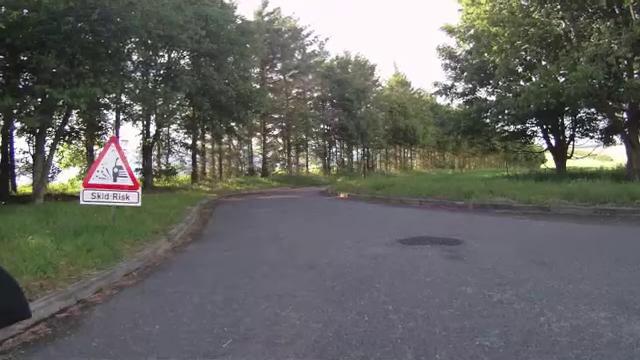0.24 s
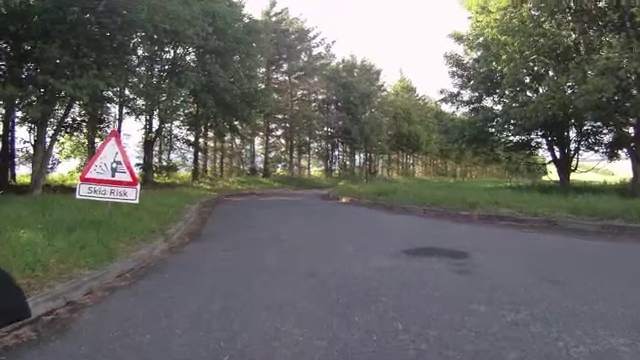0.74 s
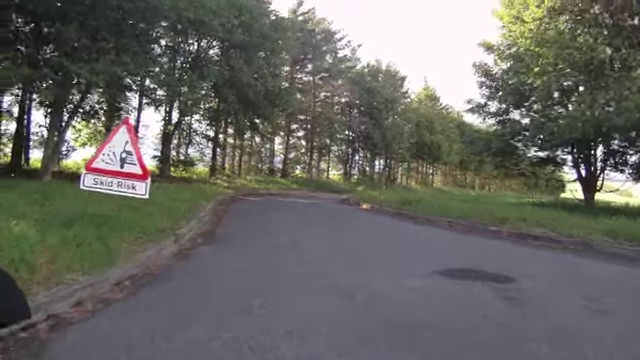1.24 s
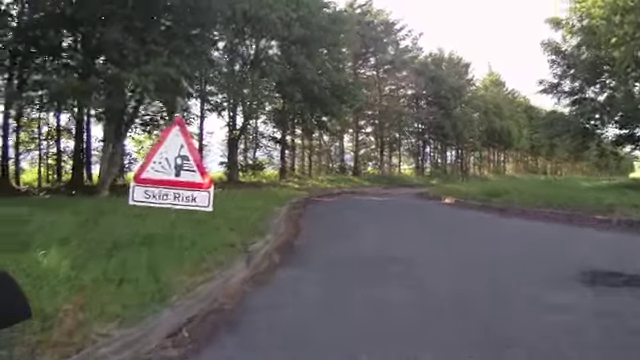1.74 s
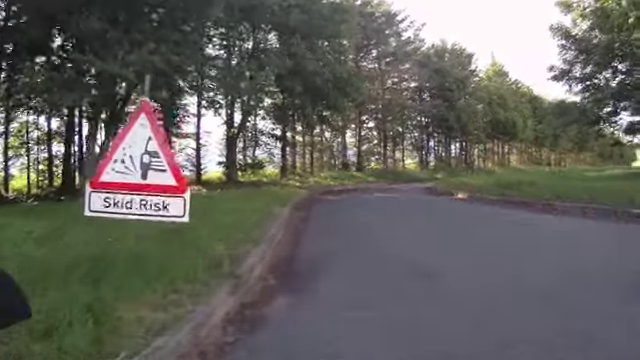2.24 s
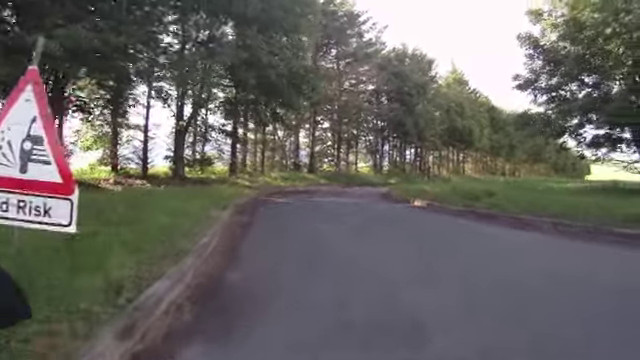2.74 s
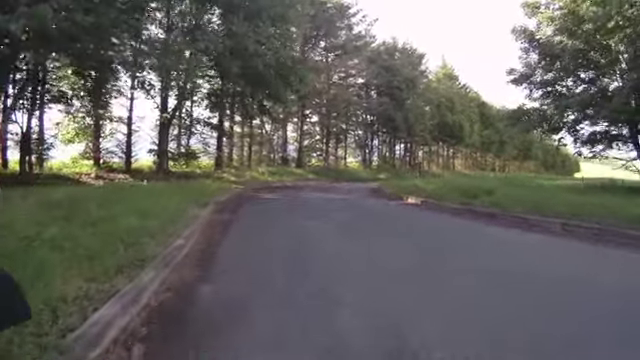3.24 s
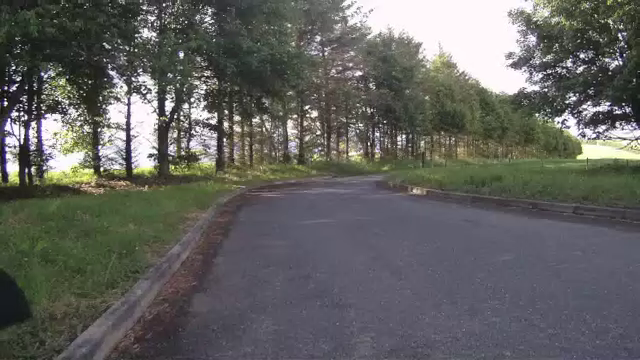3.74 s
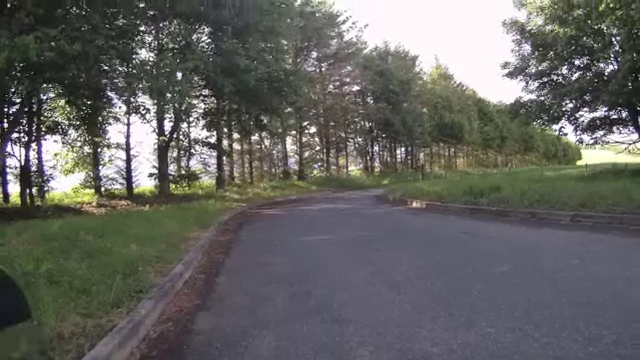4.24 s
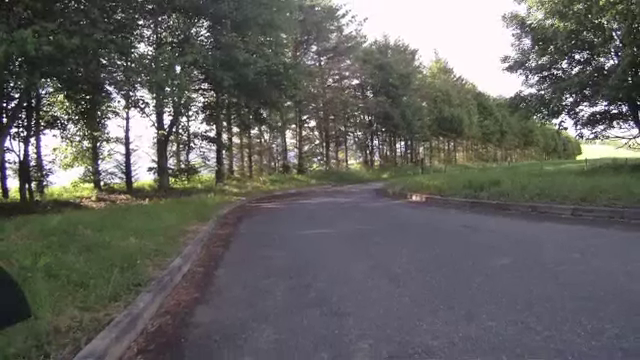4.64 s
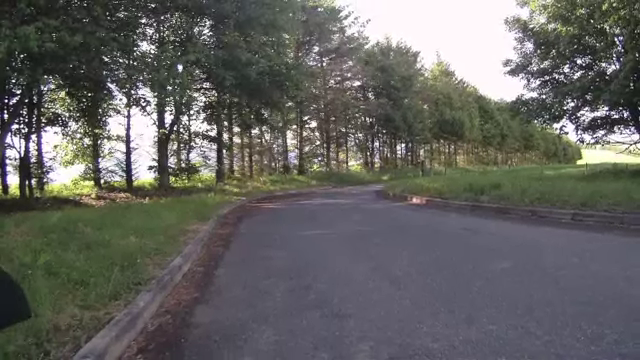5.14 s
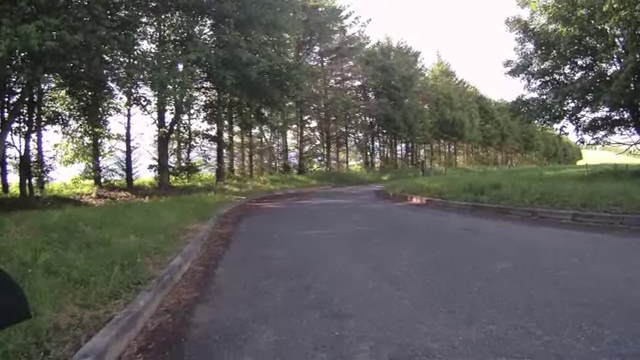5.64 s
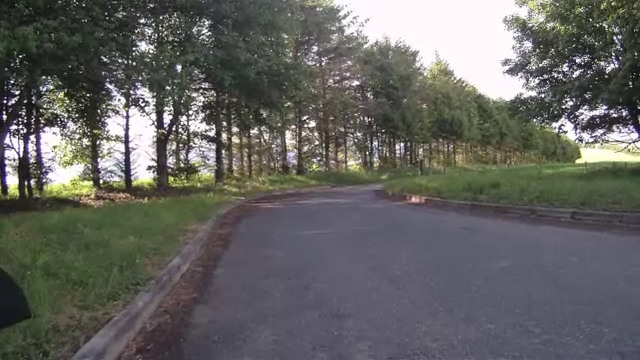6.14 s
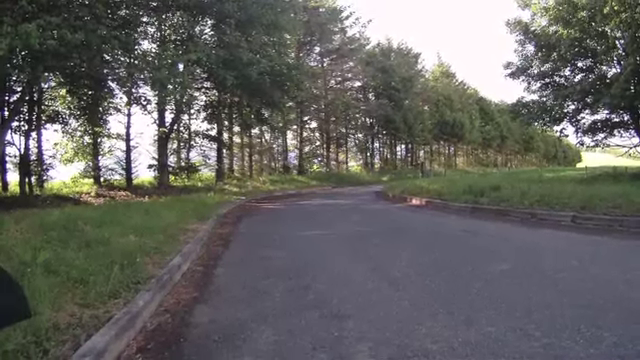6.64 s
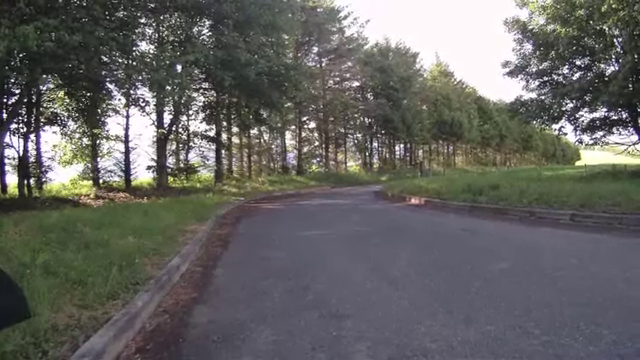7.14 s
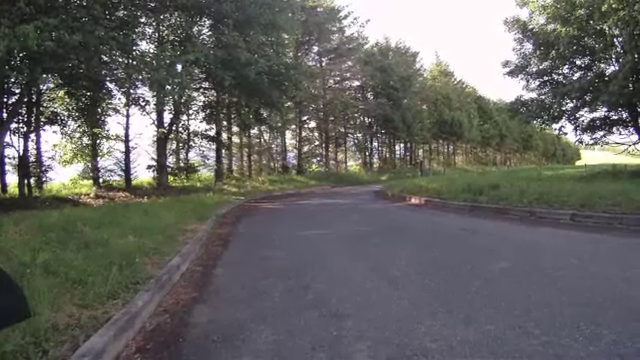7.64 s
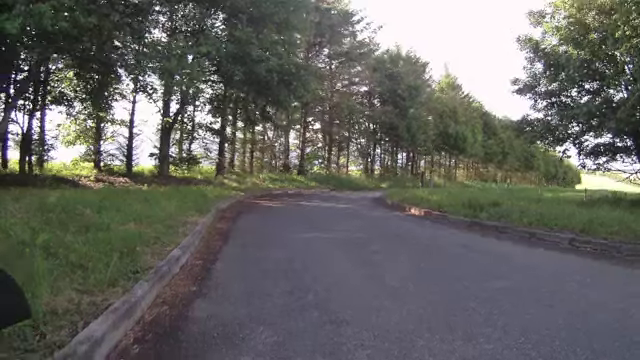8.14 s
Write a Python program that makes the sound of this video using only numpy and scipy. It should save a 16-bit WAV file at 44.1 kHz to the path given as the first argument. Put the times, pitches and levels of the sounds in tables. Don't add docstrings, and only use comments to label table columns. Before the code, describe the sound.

A motorcycle heard from a microphone in a housing fixed to it, outdoors. The engine pulls harder for about a second and a half, with low exhaust throb and whirring gear whine, then drops to a lumpy, rattling idle. A sharp knock precedes switch-off; the engine dies within a fraction of a second. Quiet hiss follows, with a few knocks, leather scuffs and faint high ticks.

```python
import sys
import numpy as np
from scipy import signal
from scipy.fft import rfft, irfft
from scipy.io import wavfile
from scipy.ndimage import uniform_filter1d

SR = 44100
rng = np.random.default_rng(int(sys.argv[2]) if len(sys.argv) > 2 else 0)


def to_wav(sig):
    pcm = np.clip(np.atleast_2d(sig), -1, 1) * 32767
    pcm = np.round(pcm).astype(np.int16)
    wavfile.write(sys.argv[1], SR, pcm.T)


def linear_from_db(decibels):
    return 10 ** (np.asarray(decibels, float) / 20)


N = 369540

# t/s, firing rate f/Hz
FIRING_RATE = [(0.0, 20.17), (0.157, 20.66), (0.337, 24.96), (0.439, 23.71), (0.886, 27.7), (1.264, 26.48),
               (1.665, 31.29), (1.794, 19.57), (1.991, 22.08), (2.118, 19.82), (3.491, 19.11),
               (3.571, 20.19), (4.02, 19.08), (4.523, 20.28), (5.091, 19.01), (5.332, 20.15), (6.199, 19.3),
               (6.45, 16.86)]
# t/s, opening/0-1
THROTTLE = [
    (0, .45),
    (.17, .45),
    (.22, 1),
    (1.68, 1),
    (1.74, .1),
    (1.81, .45),
    (2.02, .45),
    (2.1, .05),
    (6.5, .05),
]
# t/s, strength/dB, length/s
CATCHES = [
    (1.267, 1.5, 0.054),
    (1.74, -1.5, 0.023),
    (1.968, 4, 0.017),
    (2.915, 1, 0.12),
    (3.333, 4, 0.082),
    (4.535, 1.5, 0.023),
    (5.086, 1.5, 0.067),
    (6.306, 5, 0.023),
]
# f/Hz, width/Hz, level/dB, arrival/ms
PIPE_SHUT = [(40.9, 25.1, -10.9, 29.1), (76.1, 67.2, -11.8, 4.6), (106.9, 25.1, 5.0, 22.7),
             (119.0, 17.5, -3.4, 29.3), (152.7, 26.3, -4.7, 15.4)]
PIPE_OPEN = [(61.2, 40.6, -7.4, 7.6), (70.8, 70.3, -7.4, 18.5), (121.3, 24.0, -0.7, 11.0),
             (147.9, 24.0, -0.0, 14.3), (168.9, 24.0, -6.4, 20.8)]
# f/Hz, width/Hz, level/dB
BLOCK = [(420, 220, -7.5), (549, 39, 2), (585, 20, -9.5)]
# place/cycle, level/dB
WHINE_GATE = [(0, -1.5), (.1, -4), (.2, -8), (.3, -14), (.44, -11), (.52, -1), (.575, 4), (.65, -1.5),
              (.8, -1.5), (1, -1.5)]
# place/cycle, spread/cycle, level/dB
VALVES_SEAT = [
    (.09, .03, -7),
    (.43, .045, -3),
    (.62, .055, 2.5),
]
# f/Hz, width/Hz, level/dB, place/cycle, spread/cycle
COVER = [(1532, 24.6, 15.5, 0.16, 0.11), (1559, 40, 12, 0.377, 0.072), (2423, 30, -20, 0.63, 0.11),
         (2720, 28, -5.5, 0.1, 0.21), (3130, 36, -13.5, 0.25, 0.059), (3480, 53, -17, 0.26, 0.082),
         (8170, 1700, -34, 0.08, 0.039)]
# f/Hz, width/Hz, level/dB
HOUSING = [(302.4, 23.3, 8.5), (416, 23, 2.5), (505, 48, -4), (621, 52.5, 1), (843, 105, -9.5),
           (1196, 53, 6.5), (1355, 56.5, 4.5), (1557, 17, -1), (1990, 62, -14), (2384, 111, -6.5),
           (2902, 80, 1.5), (3168, 63, -0.5), (3653, 82, 1.5), (4640, 580, -20.5), (5164, 68, -28.5),
           (5560, 130, -79), (6740, 67, -30), (7990, 265, -24), (8600, 2200, -37.5), (13270, 740, -27.5),
           (15000, 1400, -33)]
# f/Hz, width/Hz, level/dB
SHELL = [(762, 26, -14.5), (1172, 156, 4.5), (1333, 258, 4.5), (1507, 160, 2), (2436, 160, -7),
         (2850, 205, 5), (3210, 390, 0), (3680, 280, -5), (4890, 505, -17.5)]
# t/s, peak level/dB, relative thud level/dB, brightness/dB, length/ms
KNOCKS = [(5.9605, -7, -13, 5, 0.83), (6.06, -18, 4.5, -7, 1.3), (6.0645, -19, -23, 10, 1.4),
          (6.128, -19.5, -29.5, -2, 4.3), (6.4439, -9.5, -33, -11, 1.2), (6.5138, -18, -20, -7, 3.7),
          (6.535, -28, -10, -1, 1.9), (6.7134, -27.5, 4, -13, 2), (6.7237, -28, -16, -4, 3.4),
          (6.7617, -28, -14, 0, 3.1), (6.767, -21.5, -12, -14, 11), (7.4018, -26.5, -4, -7.5, 4.3),
          (7.737, -3.5, -5.5, -7.5, 1.2), (7.7524, -30.5, -7.5, -6.45, 2.4), (7.7838, -49.5, -2, -1, 1.4),
          (8.1244, -48.5, 14, -7, 2.2), (8.302, -33, -10, -19, 3.5), (8.324, -14, -23, 11, 0.9)]
# f/Hz, width/Hz, level/dB, arrival/ms
FRAME = [(150, 17, 5.5, 24.5), (327, 65, 4.5, 4), (694, 130, -3.5, 1.5)]
# f/Hz, width/Hz, level/dB
SNAP = [(7900, 1700, 3.5), (14200, 2000, 5)]
# t/s, peak level/dB, centre f/Hz
TICKS = [(0.428, -33, 9600), (0.4674, -36, 5180), (1.484, -27, 5090), (1.5494, -43, 5100),
         (1.5507, -32, 5140), (1.683, -33.5, 5000), (1.787, -41, 7890), (1.926, -27, 5100),
         (1.943, -36.5, 5020), (1.98, -34, 5130), (2.692, -35, 8400), (5.9894, -42.5, 8200),
         (6.64, -37.5, 14300), (6.9438, -37.5, 13750), (7.11, -28.5, 14700), (7.2537, -39.5, 14600),
         (7.566, -39.5, 14000), (7.878, -37.5, 13500), (7.9144, -54, 7800), (8.1345, -45, 9620),
         (8.181, -39.5, 14000)]
# f/Hz, width/Hz, level/dB
RELAY_CASE = [(2970, 180, 1), (3920, 160, 1), (8200, 1500, -15.5)]
# t/s, peak level/dB, rise/ms and fall/ms per 20 dB, relative low level/dB
RUBS = [(6.42, -43.5, 33, 60, 17.5), (6.444, -22, 2.4, 42.5, -22), (6.523, -23.5, 73, 128, -22.5),
        (6.727, -31, 37, 52, 5.5), (6.774, -27, 25, 63, 0.5), (7.136, -54, 130, 1, 6),
        (7.405, -31.5, 10.6, 33, -1.5), (7.61, -53.5, 170, 201, -15), (7.738, -24.5, 2, 19.5, 4),
        (7.758, -39, 12, 112, 12), (8.131, -55, 30, 200, 18), (8.306, -39, 12, 44, 2),
        (8.327, -19.5, 4.4, 17, -28), (8.375, -40.5, 68.4, 90, 7)]
# f/Hz, width/Hz, level/dB
RUB_MIDDLE = [(639, 44, 5.5), (1146, 100, 5.5), (1372, 21, 16.5), (1593, 110, -6.5)]
RUB_LOW = [(71.5, 50, -4), (97, 38, 1), (165, 7.8, 1.5), (307, 28, 2.5), (608, 210, -11.5)]
# f/Hz, level per Hz/dB
AIR = [(15, -12.5), (25, 0.5), (49, 0.5), (179, -13), (227, -10), (298, -4.5), (434, -12), (1060, -20.5),
       (4280, -31.5), (6410, -34), (9100, -34), (12900, -36.5), (15600, -32.5)]
# f/Hz, level per Hz/dB
SIDE_TONE = [(35, -2), (60, -7), (141, 1), (317, -14), (1270, -24), (2110, -29), (2470, -40), (2980, -24),
             (3660, -33), (4020, -72), (4730, -45), (5950, -38), (11100, -41), (15000, -46)]

IDLE_HZ = 19.6
FIRE_IDLE, FIRE_LOAD = 0.3, 0.5
EXHAUST_DB, EXHAUST_LOAD_DB, EXHAUST_DB_PER_HZ = -16.5, 9.5, -0.1844
WHINE_DB, WHINE_LOAD_DB, WHINE_DB_PER_HZ = -22.5, 2.5, -1.33
RATTLE_DB, RATTLE_DB_PER_HZ = -33, 0.1777
CATCH_RATTLE, CATCH_WHINE = 0.99, -0.9
WHINE_ORDER, WHINE_RIPPLE = 61.5, 0.046
CAM_ORDER, CAM_RIPPLE = 154, 0.048
KEY_OFF_S, GEARS_SLACK_S, STOP_S = 6.245, 6.26, 6.45
DIE_DB_PER_S, WHINE_DROP_DB = 86, 12.5
COAST_DB = -23.5
HIGH_LASTS, LOW_LASTS = 0.93, 1.7


def engine():
    t = np.arange(N) / SR
    hz, = curve(FIRING_RATE)
    cycle = np.cumsum(hz) / SR - 0.172
    load, = curve(THROTTLE)
    rev = np.maximum(hz - IDLE_HZ, 0)
    catch = sum(db * np.exp(-0.5 * ((t - s) / length) ** 2) for s, db, length in CATCHES)
    dying = DIE_DB_PER_S * np.maximum(t - KEY_OFF_S, 0)
    slack = WHINE_DROP_DB * np.clip((t - GEARS_SLACK_S) / 0.016, 0, 1)

    exhaust_db = EXHAUST_DB + EXHAUST_LOAD_DB * load + EXHAUST_DB_PER_HZ * rev + catch - dying
    rattle_db = RATTLE_DB + RATTLE_DB_PER_HZ * rev + CATCH_RATTLE * catch - 0.38 * dying
    whine_db = WHINE_DB + WHINE_LOAD_DB * load + WHINE_DB_PER_HZ * rev + CATCH_WHINE * catch - slack
    running = np.clip((STOP_S - t) / 0.015 + 1, 0, 1)

    sound = coasting(cycle, t) + linear_from_db(exhaust_db) * exhaust(cycle, load)
    sound = sound + linear_from_db(rattle_db) * rattle(cycle, load)
    return running * (sound + linear_from_db(whine_db) * whine(cycle))


def exhaust(cycle, load):
    late = 0.2 * (1 - load)
    loaded = np.clip(2 * load - 0.05, 0, 1) * firings(cycle - FIRE_LOAD - late, 0.25)
    idling = (1 - load) ** 3 * firings(cycle - FIRE_IDLE, 1.06)
    idle = level(pipe(idling, PIPE_SHUT), -2.7)
    pull = level(pipe(loaded, PIPE_OPEN), -10.0)
    gas = ring(ring(rng.standard_normal(N), 144, 123), 160, 150)
    swirl = level(gas, -14.5) * (1 - 0.68 * load)
    block = np.roll(level(body(loaded, BLOCK), -33.5), int(0.012 * SR))
    drum = pipe(firings(cycle - 0.75, 1.5), [(305.3, 33, 0, 0)])
    tank = level(drum, -19.5) * linear_from_db(-14 * load)
    chuff = level(pipe(loaded * (1 - load), [(89.7, 40, 0, 5)]), -19)
    return idle + pull + chuff + swirl + block + tank


def coasting(cycle, t):
    puffs = pipe(firings(2 * cycle - 0.3, 0.63), [(51.7, 59, 1.5, -0.5), (94.7, 68, -10.5, 2)])
    return (t > KEY_OFF_S) * level(puffs, COAST_DB)


def whine(cycle):
    turn = cycle + WHINE_RIPPLE / (2 * np.pi) * np.sin(2 * np.pi * (cycle - 0.83))
    shake = uniform_filter1d(rng.standard_normal(N), 300) * 17
    gate = linear_from_db(np.interp(cycle % 1, *np.transpose(WHINE_GATE)) + shake)
    tone = level(gate * np.sin(2 * np.pi * WHINE_ORDER * turn + 0.2 * shake), 0)
    return 0.68 * ring(tone, 1205, 110) + 0.28 * tone


def rattle(cycle, load):
    seating = sum(linear_from_db(db) * bump(cycle, at, spread) for at, spread, db in VALVES_SEAT)
    gate = 0.7 + 0.8 * load + seating
    clicks = rng.standard_normal(N) * linear_from_db(0.48 * uneven_sizes(40)) * gate
    valves = 0
    for f, width, db, at, spread in COVER:
        valves = valves + linear_from_db(db) * ring(bump(cycle, at, spread) * rng.standard_normal(N), f, width)
    valves = (1 - 0.071 * load) * level(valves, -4.5)
    return level(body(clicks, HOUSING), 5.02) + valves + (1 - load) * cam(cycle)


def cam(cycle):
    turn = cycle + CAM_RIPPLE / (2 * np.pi) * np.sin(2 * np.pi * (cycle - 0.33))
    shake = uniform_filter1d(rng.standard_normal(N), 200) * 14
    tone = np.sin(2 * np.pi * CAM_ORDER * turn + 0.5 * shake)
    tone = bump(cycle, 0.24, 0.13) * linear_from_db(3.9 * shake) * tone
    return level(body(tone, [(2934, 300, -0.5), (3240, 260, -0.5)]), -7.5)


def knocks():
    crack, upper, bright, thud = np.zeros((4, N))
    for s, db, low_db, bright_db, ms in KNOCKS:
        blow = burst(s, db + 18.5, ms)
        crack += blow
        upper += linear_from_db(bright_db - 3) * blow
        bright += burst(s, db + bright_db - 24, 3 + 2.5 * ms)
        thud += burst(s + 0.0022, db + low_db + 15, 4 * ms)
    shell = body(crack, SHELL[:4]) + body(upper, SHELL[4:])
    return shell + body(bright, SNAP) + pipe(thud, FRAME)


def rubbing():
    grains = rng.standard_normal(N) * linear_from_db(3.3 * uneven_sizes(90))
    middle = level(body(grains, RUB_MIDDLE), -2.2)
    high = level(body(grains, HOUSING[8:]), -11.5)
    low = level(body(rng.standard_normal(N), RUB_LOW), -1.1)
    return strokes(1, 0) * middle + strokes(HIGH_LASTS, 0) * high + strokes(LOW_LASTS, 0.66) * low


def strokes(lasts, low_share):
    ms = np.arange(0, N + 16, 16) * 1000 / SR
    shape = 0
    for s, db, rise, fall, low_db in RUBS:
        away = np.maximum((s * 1000 - ms) / rise, (ms - s * 1000) / (fall * lasts))
        shape = shape + linear_from_db(db + low_share * low_db - 20 * away)
    return np.interp(np.arange(N) * 1000 / SR, ms, shape)


def ticks():
    out = 0
    for s, db, hz in TICKS:
        click = burst(s, db, 7.5)
        out = out + 0.56 * ring(click, hz, 4900) + 2.4 * body(click, RELAY_CASE)
    return out


def background():
    hum = np.sin(2 * np.pi * 179 * np.arange(N) / SR)
    return level(coloured(AIR), -52) + level(hum, -57.5)


def firings(turn, lean):
    at = np.flatnonzero(np.diff(np.maximum.accumulate(np.floor(turn))) > 0)
    timing, strength = rng.standard_normal((400, 2))[:len(at)].T * lean
    shift = (0.0006 * SR * timing).astype(int)
    pulses = np.zeros(N)
    pulses[np.clip(at + shift, 0, N - 1)] = linear_from_db(1.1 * strength)
    return pulses


def bump(cycle, at, spread):
    away = (cycle - at + 0.5) % 1 - 0.5
    return np.exp(-0.5 * (away / spread) ** 2)


def burst(s, db, ms):
    out, i = np.zeros(N), int(s * SR)
    t = np.arange(min(4000, N - i)) / SR
    noise = rng.standard_normal(4000)[:len(t)]
    out[i:i + len(t)] = linear_from_db(db) * noise * np.exp(-t * 1000 / max(ms, 0.2))
    return out


def uneven_sizes(hold):
    sizes = np.repeat(rng.exponential(size=N // hold + 1), hold)[:N]
    return np.minimum(sizes, 3)


def ring(x, hz, width):
    return signal.lfilter(*signal.iirpeak(hz, hz / width, fs=SR), x)


def body(x, modes):
    return sum((-1) ** k * linear_from_db(db) * ring(x, f, w) for k, (f, w, db) in enumerate(modes))


def pipe(pulses, modes):
    out = 0
    for f, width, db, ms in modes:
        swell = ring(ring(pulses, f, width), f, width)
        out = out + linear_from_db(db) * np.roll(swell, int(ms * SR / 1000))
    return out


def coloured(points):
    f = np.maximum(np.arange(N // 2 + 1) * SR / N, 1)
    hz, db = np.transpose(points)
    gain = linear_from_db(np.interp(np.log(f), np.log(hz), db))
    return irfft(rfft(rng.standard_normal(N)) * gain, N)


def level(x, db):
    return x * linear_from_db(db) / np.sqrt(np.mean(x ** 2))


def curve(table):
    s, *columns = np.transpose(table)
    return [np.interp(np.arange(N) / SR, s, c) for c in columns]


def scene():
    mid = engine() + knocks() + ticks() + rubbing() + background()
    follow = np.sqrt(uniform_filter1d(mid ** 2, 2000) + 1e-12)
    side = follow * level(coloured(SIDE_TONE), -33)
    return np.array([mid + side, mid - side])


def band_limit(x):
    return signal.sosfilt(signal.butter(12, 15750, fs=SR, output="sos"), x)


def record(dry):
    soft = np.tanh(0.69 * dry) / 0.6
    low_pass = signal.ellip(8, 0.2, 70, 15700, fs=SR, output="sos")
    mix = signal.sosfilt(low_pass, soft)
    return band_limit(mix)


dry = scene()
out = record(dry)
to_wav(out)
```